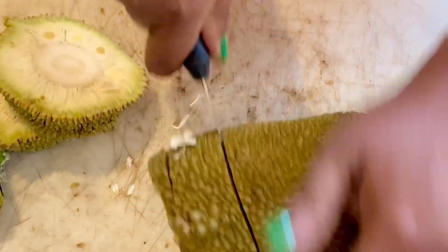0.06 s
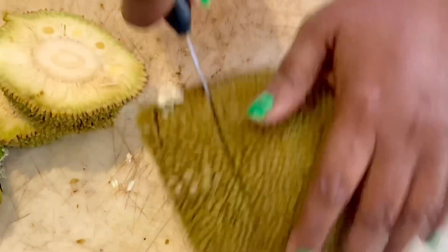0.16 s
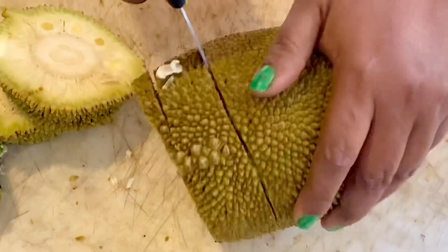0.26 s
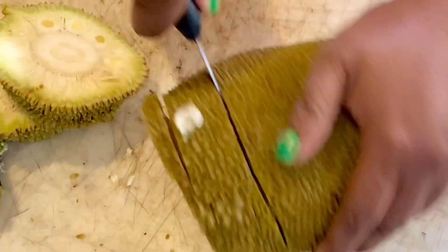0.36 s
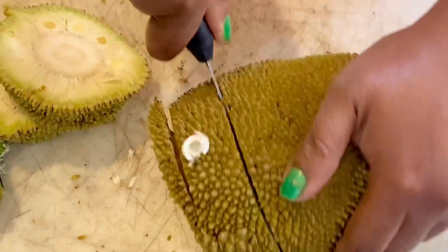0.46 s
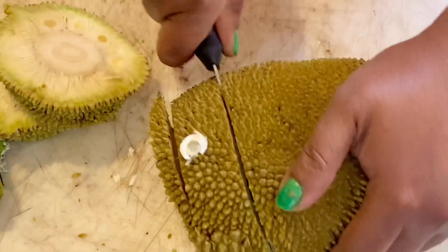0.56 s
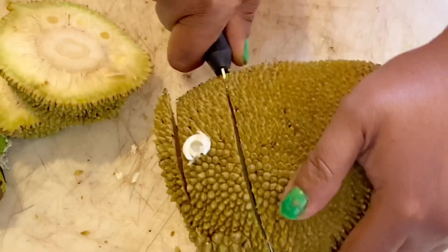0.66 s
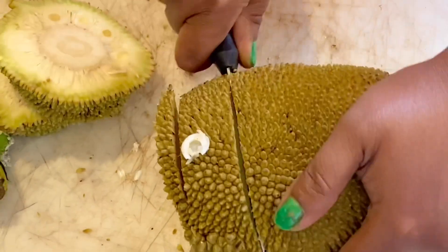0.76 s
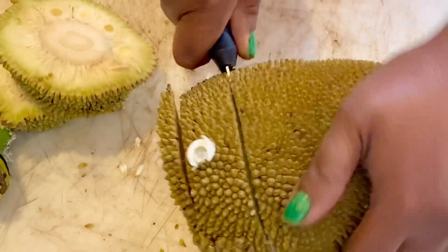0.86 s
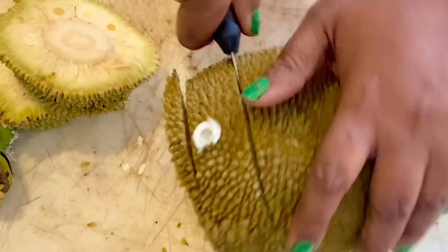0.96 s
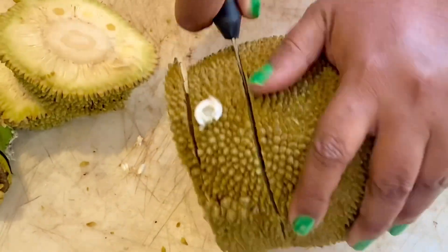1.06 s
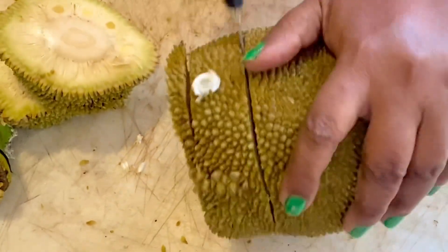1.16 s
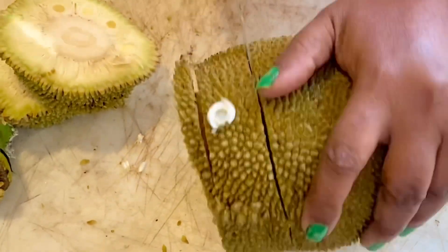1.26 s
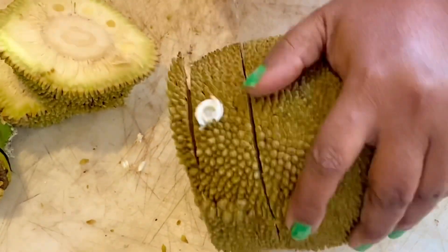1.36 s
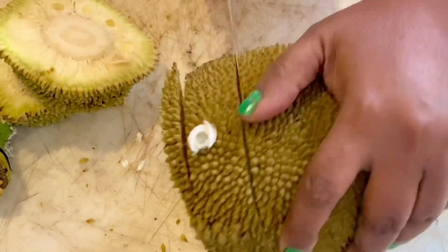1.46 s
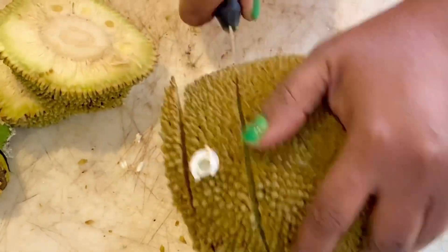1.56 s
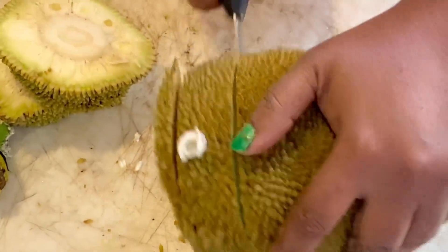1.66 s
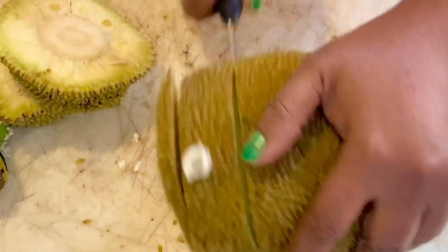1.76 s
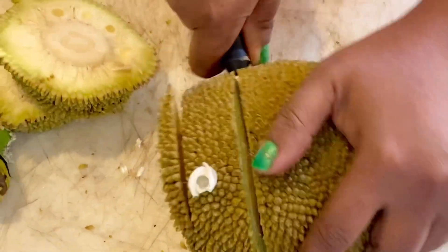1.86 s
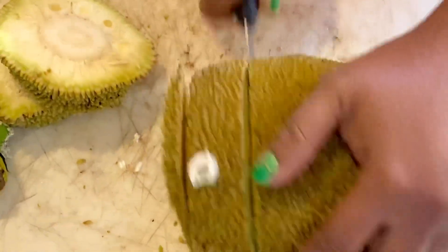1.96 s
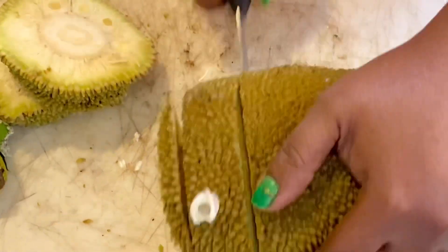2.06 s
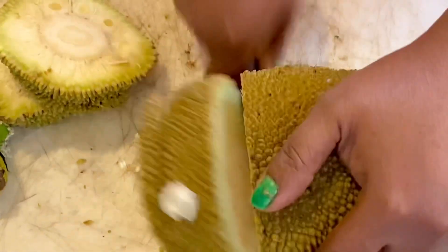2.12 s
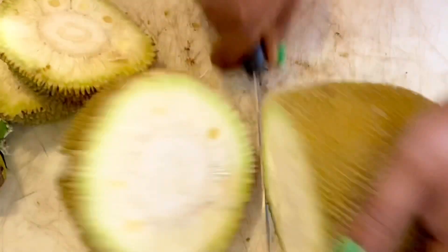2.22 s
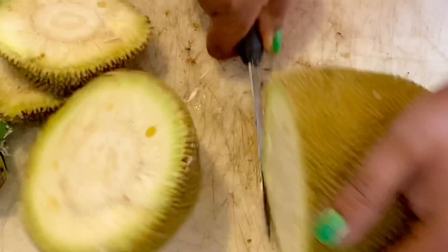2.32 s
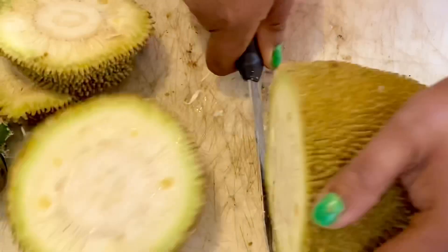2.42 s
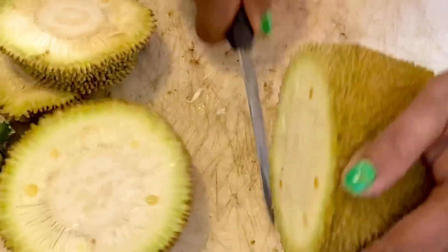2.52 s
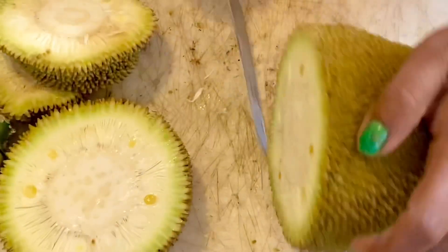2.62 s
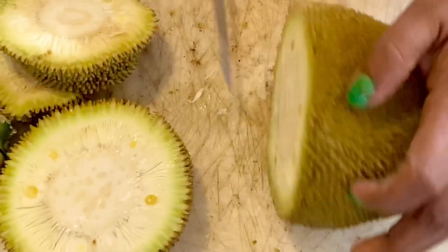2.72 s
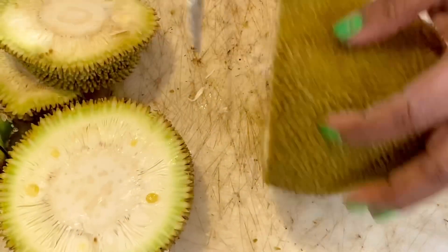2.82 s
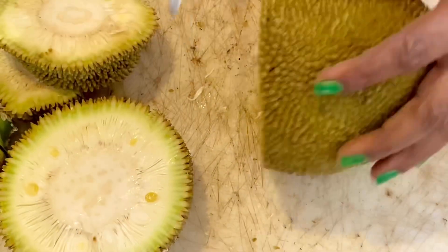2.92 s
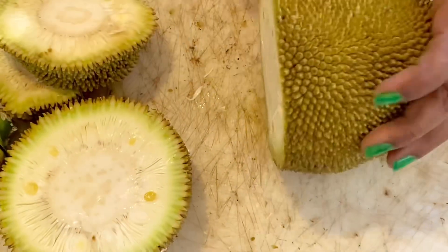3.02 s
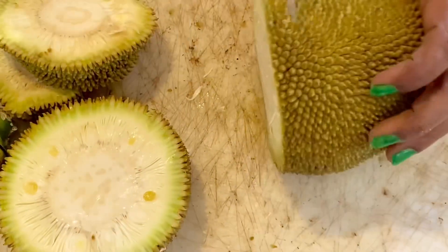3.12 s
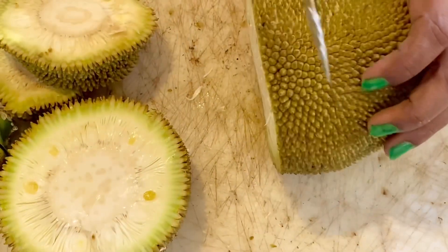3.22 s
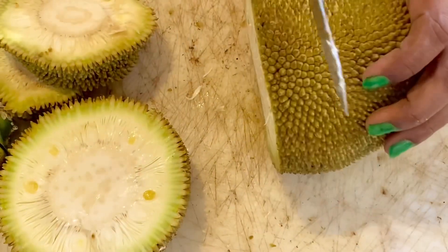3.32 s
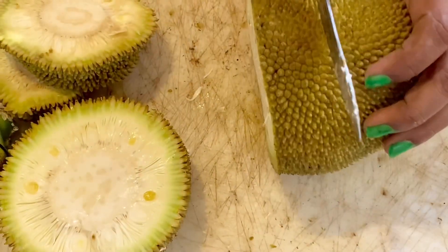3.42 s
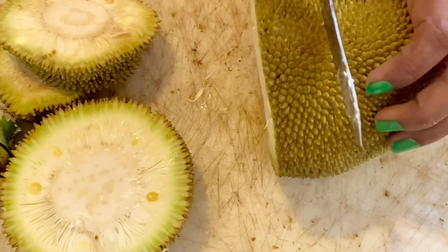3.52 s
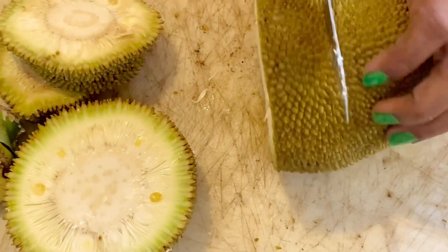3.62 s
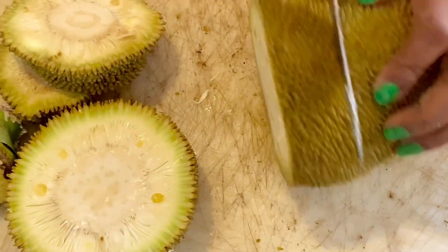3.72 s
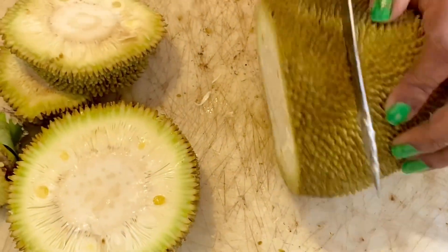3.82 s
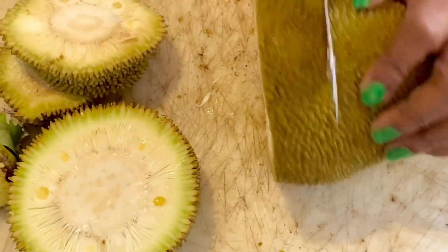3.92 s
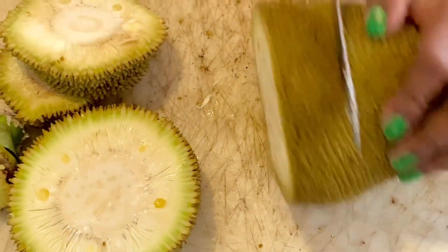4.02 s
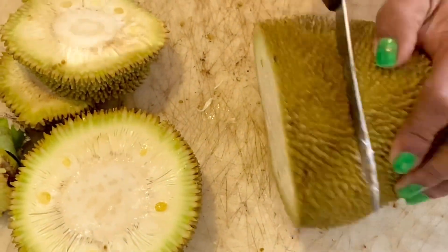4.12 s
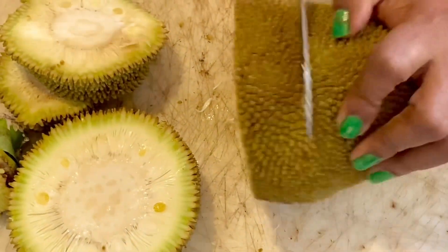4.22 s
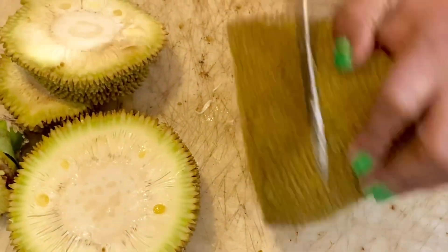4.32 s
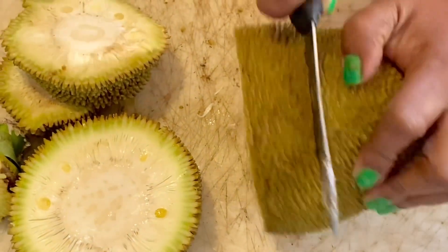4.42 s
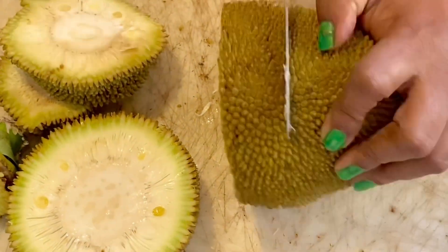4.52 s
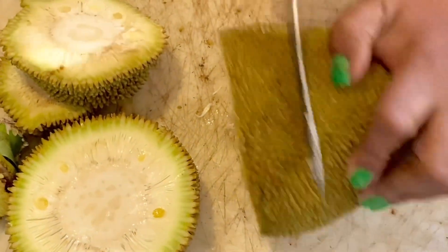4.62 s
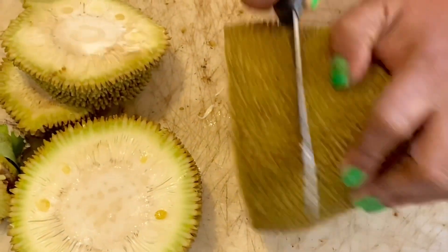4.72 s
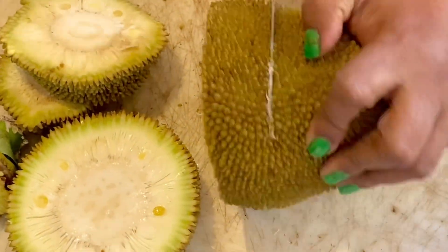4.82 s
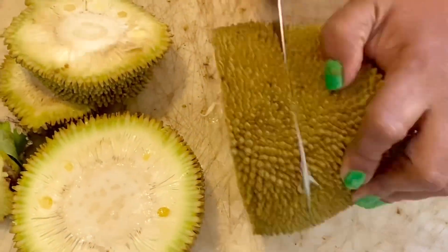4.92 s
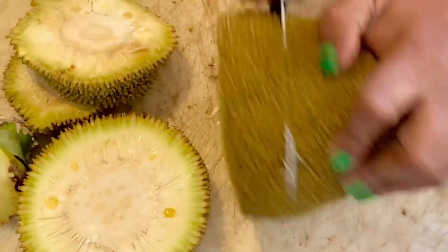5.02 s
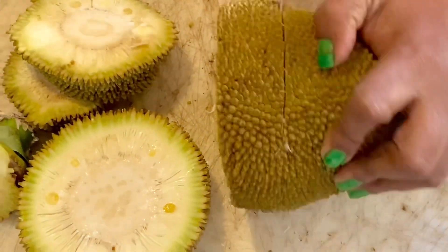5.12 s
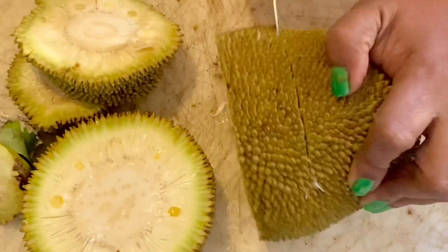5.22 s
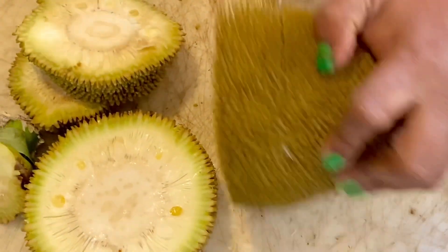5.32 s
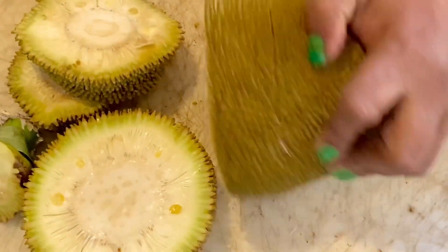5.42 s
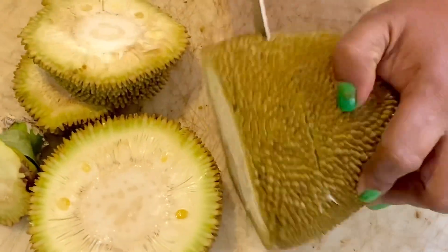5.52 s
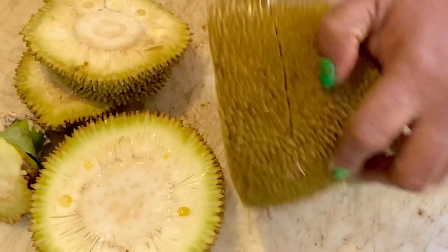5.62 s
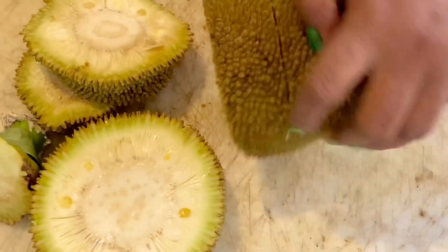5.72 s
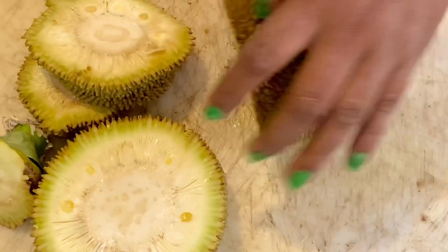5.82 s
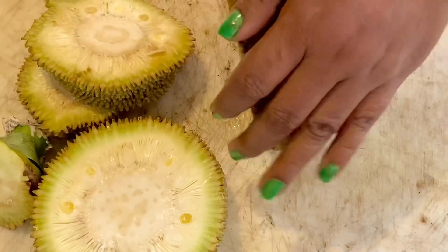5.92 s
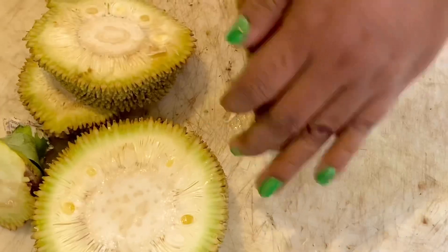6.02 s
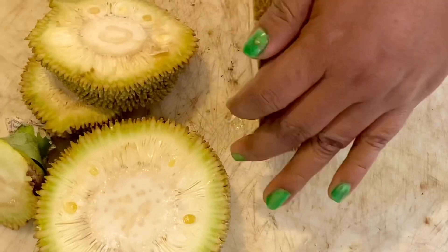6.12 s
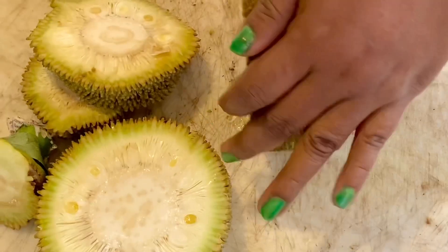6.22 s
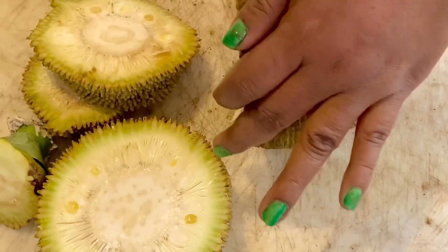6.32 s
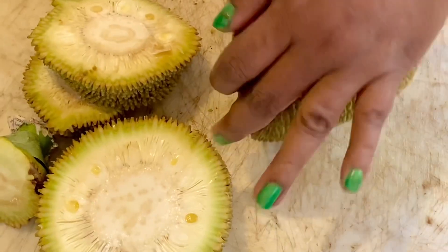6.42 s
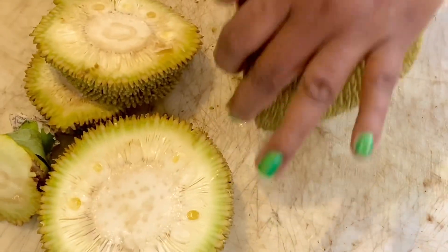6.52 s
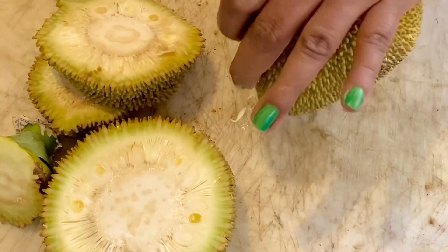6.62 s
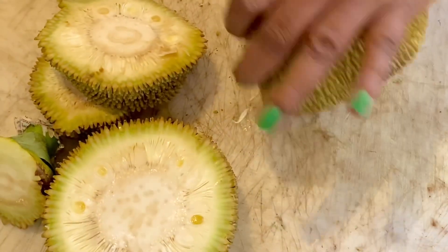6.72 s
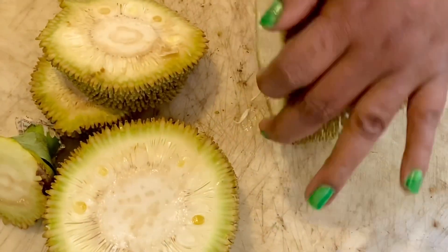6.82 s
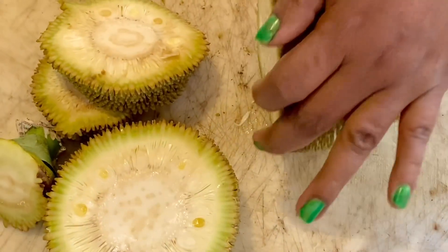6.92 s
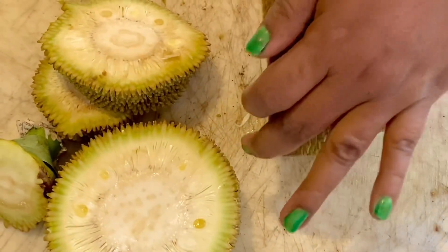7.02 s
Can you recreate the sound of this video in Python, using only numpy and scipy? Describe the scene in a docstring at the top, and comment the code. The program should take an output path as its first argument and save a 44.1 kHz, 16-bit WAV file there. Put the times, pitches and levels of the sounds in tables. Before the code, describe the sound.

A heavy jackfruit scuffs and bumps on a cutting board as a kitchen knife saws into it with short, crunchy strokes and tiny snaps. The blade breaks through with one sharp, loud knock, and a wet slice flops over. Quicker sawing follows, then the fruit is dragged around with soft bumps and faint squeaks. It is heard close up in a slightly echoing kitchen with a low fridge hum.

```python
"""First a knobbly jackfruit scuffs over a cutting board, then a kitchen knife saws into it.
Each stroke tears a spray of tiny fibres, and spikes of the rind snap. The blade breaks through and
knocks the board, and the wet slice flops over. Quick sawing starts the next cut, then the heavy fruit
is dragged round, bumping and squeaking. The kitchen echoes, and a fridge hums behind it all."""
import sys
import numpy as np
from scipy import signal
from scipy.fft import rfft, irfft
from scipy.io import wavfile
from scipy.ndimage import uniform_filter1d

SR = 44100
rng = np.random.default_rng(int(sys.argv[2]) if len(sys.argv) > 2 else 0)


def unload_audio(sound):
    """Save the sound as a 16-bit wav file, at the path given as the first command line argument."""
    columns = np.transpose(np.atleast_2d(sound))
    # keep every value between -1 and 1, then stretch to whole-number steps
    steps = np.round(np.clip(columns, -1, 1) * 32767)
    wavfile.write(sys.argv[1], SR, steps.astype(np.int16))


N = 311777
T = np.arange(N) / SR

# knife strokes: t/s, length/s, level/dB, hollow flesh/dB, hiss/dB (the last two on top of the level)
STROKES = [(.282, .093, -58, 2, -3.5), (.334, 0.16, -60, 8.5, -1), (.474, .09, -62.5, 1, 2),
           (1.07, .18, -65.5, 1, 1), (1.37, .16, -54.5, 3.5, -3.5), (1.704, .1, -52.5, 5, -1.5),
           (1.868, .12, -57.5, 4, 3.5), (2.0, .09, -53.5, 5.5, 2.5), (2.05, 0.086, -40, 0, 2),
           (3.527, 0.081, -66, 4, -1), (3.651, 0.096, -61.5, 5, -1), (3.823, .11, -55, 0.5, 3),
           (3.976, 0.076, -51, -2.5, -0.5), (4.143, 0.077, -53.5, 6, 3), (4.275, 0.092, -55, 2, 2.5),
           (4.422, 0.086, -56, 5.5, 2.5), (4.555, 0.099, -55, 0.5, 0), (4.698, 0.1, -55, 6.5, 0),
           (4.851, 0.09, -55.5, 6, -0.5), (4.995, 0.12, -57, 9, 1.5), (5.137, 0.09, -58, 2, -1)]
# the fruit shoved and turned on the board: same columns as the strokes
SCUFFS = [(-.03, .1, -65, 2, -4), (.04, .18, -56, 2, -12), (.79, 0.17, -66.5, 2.5, -3.5),
          (1.588, .091, -69, 10, -13), (2.46, 0.36, -71, -3, -4.5), (2.815, 0.073, -68, 5, -10),
          (3.01, 0.14, -71.5, -3.5, -22), (5.263, 0.087, -52.5, 5, -9), (5.342, 0.043, -70.5, 21, -11),
          (5.387, .11, -61, 2, -6.5), (5.5, 0.27, -59, 3.5, -5.5), (5.95, .12, -55, 3.5, -3.5),
          (6.41, 0.22, -66.5, 0, -7), (6.633, 0.16, -59.5, -3, -1), (6.9, .17, -67.5, 10, -4)]
# tone of the soft flesh, the rasping rind and the hissing edge: f/Hz, level/dB
FLESH_TONE = [(150, -12), (300, -1), (480, 2.5), (690, -6), (850, 0), (1080, -2.5), (1280, -5.5),
              (1500, -3.5), (1800, -5.5), (2050, -7.5), (2600, -20), (5000, -50)]
RIND_TONE = [(900, -34.5), (1700, -6.5), (2200, -1), (3000, -0.5), (3700, -2), (4400, -6), (5100, -3.5),
             (6000, -7), (7000, -7.5), (8500, -20), (12000, -34.5)]
EDGE_TONE = [(3500, -46.5), (6500, -5.5), (8500, 2.5), (10500, 0.5), (14500, -5), (16000, -1.5)]
# hollow notes of the fruit: f/Hz, width/Hz, level/dB
HOLLOW_NOTES = [(880, 90, 2), (1260, 110, -0.5)]
# single spikes of the rind snapping: t/s, level/dB
SNAPS = [(.3187, -36), (.5013, -43), (0.5174, -46), (0.599, -62), (0.6577, -72), (1.3691, -46),
         (1.412, -41.5), (1.707, -37.5), (1.754, -37), (1.8791, -36.5), (1.8914, -39.5), (1.9507, -38),
         (2.0204, -40), (2.062, -31), (2.855, -59.5), (3.016, -62.5), (3.1, -67.5), (3.8215, -57.5),
         (3.962, -46), (3.973, -53), (3.9974, -33), (4.155, -54), (4.4335, -42.5), (4.719, -46.5),
         (4.9008, -36.5), (5.0479, -42.5), (5.99, -42.5), (6.757, -47), (6.8789, -61.5), (6.979, -43.5),
         (7.0481, -46.5)]
# tone of a spike's bright tick and of its woody base: f/Hz, level/dB
TICK_TONE = [(1500, -15.5), (4000, -11), (7000, -1), (10000, -2), (14000, -4.5), (16000, -4.5)]
WOODY_TONE = [(200, -6.5), (500, 0.5), (900, 2), (1600, 1), (3000, -4), (5000, -6.5), (7000, -11),
              (11000, -28.5)]
# the blade hitting the board and bouncing twice: t/s, level/dB, contact time/s
KNOCKS = [(2.1047, 0, .00012), (2.1078, -20, .00017), (2.1168, -19, .00019)]
# blade and board ringing together: f/Hz, level/dB, t60/s (the time to fade by 60 dB)
BOARD_NOTES = [(167, -21.4, 0.044), (315, -23.9, 0.13), (387, -20.7, 0.113), (509, -17.6, 0.067),
               (605, -25.7, 0.055), (659, -24.5, 0.13), (812, -10.2, 0.033), (880, -6.8, 0.043),
               (1132, -20.2, 0.13), (1298, -12.4, 0.012), (1462, -22.7, 0.121), (1528, -24.8, 0.13),
               (1786, -10.5, 0.019), (1830, -22.4, 0.13), (1858, -19.8, 0.117), (2027, -19.7, 0.088),
               (2205, -18.9, 0.098), (2408, -10.8, 0.049), (2462, -7.9, 0.022), (2783, -16.0, 0.019),
               (2983, -17.1, 0.071), (3081, -29.5, 0.13), (3219, -14.8, 0.026), (3660, -17.4, 0.025),
               (4057, -19.0, 0.014), (4701, -23.9, 0.044), (5442, -21.2, 0.018), (6507, -16.7, 0.015),
               (7008, -18.3, 0.017), (7500, -19.7, 0.012)]
# tone of the crack that the knock sends into the room: f/Hz, level/dB
CRACK_TONE = [(100, -12), (400, -3.5), (900, -10), (1400, -2.5), (2300, -0.5), (3000, -4.5), (3800, -11),
              (5000, -15.5), (7000, -22.5), (9000, -36), (15000, -39.5)]
# the fruit bumping the board, and at 2.105 s the low thud of the blade's knock: t/s, level/dB, contact time/s,
# share of ring time the hands leave (0-1)
BUMPS = [(0.319, -38, 0.0013, 1), (.332, -36.5, 0.0025, 1), (.386, -24.5, 0.0073, 0.86),
         (0.413, -27, 0.0061, 1), (.429, -27.5, 0.0058, 1), (0.601, -37, 0.006, 1), (.94, -43, 0.0075, 0.8),
         (1.445, -34.5, 0.0073, 1), (1.494, -36, 0.0068, .6), (1.779, -13.5, 0.0064, 0.31),
         (2.105, -25, 0.0018, 0.6), (2.227, -27.5, 0.0084, 1), (2.26, -36.5, 0.0029, 1),
         (3.922, -36, 0.0085, 0.97), (4.91, -17.5, 0.0088, 0.68), (5.016, -35.5, 0.0031, 0.9),
         (5.212, -29.5, 0.0067, 0.6), (5.902, -41.5, 0.0014, 0.63), (5.993, -39.5, .001, 0.82),
         (6.011, -37, .0017, 0.6), (6.57, -35, 0.011, 1), (6.772, -42.5, 0.0073, 0.84)]
# board and counter ringing under the heavy fruit: f/Hz, level/dB, t60/s
COUNTER_NOTES = [(60, -8, 0.36), (91, -4, 0.21), (115.8, -2, 0.18), (173, -3, 0.05), (224.4, -7.5, 0.2),
                 (328, -3, 0.061), (436, -3, 0.071), (620, -7.5, 0.055), (840, -9, 0.055)]
# tone of the counter's rumble: f/Hz, level/dB
RUMBLE_TONE = [(20, -21), (48, 4.5), (75, 6.0), (130, -6.0), (250, -6.5), (420, -16.5), (900, -46)]
# the cut slice flopping over and settling: t/s, level/dB, contact time/s
FLOPS = [(2.376, -26, 0.0013), (2.477, -29, 0.001)]
# the slice thudding on the board: f/Hz, level/dB, t60/s
SLICE_NOTES = [(55, -2.5, 0.27), (87.7, -2.5, 0.27), (126, -2.5, 0.23), (180, -1, 0.28), (234, -9.5, 0.2),
               (299, -4, 0.14), (392, -9, 0.084), (477, -18, 0.053)]
# tone of its wet slap: f/Hz, level/dB
SLAP_TONE = [(150, -11), (400, 0.5), (620, -6), (820, -1), (1200, -17), (4000, -28), (12000, -45)]
# the spiky rind squeaking on the board: t/s, length/s, level/dB, f/Hz
SKIDS = [(0.103, 0.077, -60.5, 2700), (0.114, 0.074, -51.5, 820), (0.344, 0.15, -57, 2920),
         (.40, 0.036, -53.5, 1660), (5.251, 0.096, -56.5, 2650), (6.647, 0.083, -55.5, 2570),
         (6.686, 0.042, -60, 3060), (6.76, 0.024, -61, 2650)]
# how long the kitchen echoes: f/Hz, t60/s
ECHO_TIMES = [(100, 0.22), (500, 0.68), (2200, 0.89), (5000, 0.82), (9000, 0.92), (16000, 0.091)]
# tone of the echo, and of the part that is opposite in left and right: f/Hz, level/dB
ECHO_TONE = [(60, -5.5), (300, 0), (700, -1), (1300, -4.5), (2300, -3), (3200, -6), (4500, -7.5),
             (8000, -8.5), (16000, -5.5)]
SIDE_TONE = [(60, -1.5), (300, -2.0), (800, 6.0), (1300, 11.0), (2400, 3.5), (4400, -10.5),
             (8000, -5.5), (16000, 12.5)]
# the fridge's hum notes, the tone of its low rush of air and of its fan: f/Hz, level/dB
HUM_NOTES = [(59.3, -58.5), (118.8, -58.5), (181, -75)]
AIR_TONE = [(25, -17.5), (50, -2), (70, 0), (90, -12), (120, -6), (200, -4), (300, -16.5), (600, -21.5),
            (1400, -34.5), (2400, -31), (3000, -41), (4200, -37), (8000, -57), (11000, -68.5),
            (15000, -83.5)]
FAN_TONE = [(60, 2), (250, 0), (700, -9.5), (1400, -9), (2000, -14), (3200, -41.0), (8000, -51.5),
            (15000, -71.5)]


def sawing():
    """The blade catches on the knobs and tears flesh and rind; between cuts the rind scuffs the board."""
    fibres = deepening_cut(tearing(per_s=3000, spread_db=3.0, smooth=.45))
    rind, edge = unit(colour(fibres, RIND_TONE)), unit(colour(fibres, EDGE_TONE))
    flesh = unit(colour(tearing(per_s=1500, spread_db=3.5, smooth=.5), FLESH_TONE))
    catching = undb(1.5 * wander(170))
    return catching * (slides(STROKES, flesh, rind, edge) + slides(SCUFFS, flesh, rind, edge))


def tearing(per_s, spread_db, smooth):
    """Many tiny breaks of very uneven size, over a smooth rub."""
    size = undb(spread_db * np.minimum(rng.exponential(size=N), 4))
    breaks = (rng.random(N) < per_s / SR) * size * rng.choice([-1, 1], N)
    return unit(unit(breaks) + smooth * rng.standard_normal(N))


def deepening_cut(x, depth=.2, count=6):
    """As the cut deepens and the fruit turns, short echoes inside it swell and fade, shifting its tone."""
    lags = rng.integers(20, 190, count)  # in samples
    return unit(x + depth * sum(wander(9) * np.roll(x, lag) for lag in lags))


def slides(rows, flesh, rind, edge):
    """Each slide speeds up and stops, sounding the hollow flesh, the rasping rind and a fine hiss."""
    out = np.zeros(N)
    # each new grip moves the hollow notes by about a tenth
    grips = np.exp(0.098 * rng.standard_normal((len(rows), len(HOLLOW_NOTES))))
    for (s, length, db, flesh_db, hiss_db), grip in zip(rows, grips):
        now = (T > s) & (T < s + length)
        speed = np.abs(np.sin(np.pi * (T[now] - s) / length))
        notes = sum(undb(note_db) * resonate(flesh[now], hz * shift, width)
                    for (hz, width, note_db), shift in zip(HOLLOW_NOTES, grip))
        rasp = undb(flesh_db) * unit(flesh[now] + notes) + rind[now] + undb(hiss_db) * edge[now]
        out[now] += undb(db) * speed ** 1.5 * rasp  # faster is louder
    return out


def spike_snaps():
    """A spike gives way with a bright tick that also sounds its woody base."""
    tick, wood = np.zeros(N), np.zeros(N)
    for s, db in SNAPS:
        wood_db = -44.5 + .55 * (db + 36)  # grows less than the tick, so hard snaps are brighter
        add(tick, s, undb(db) * burst(t60=0.014) * (1 - fade(.004)))
        add(wood, s, undb(wood_db) * burst(t60=0.056) * (1 - fade(0.0017)))
    return undb(-2) * colour(tick, TICK_TONE) + colour(wood, WOODY_TONE)


def blade_knock():
    """The freed blade slams down: it rings with the board and sends a hard crack into the kitchen."""
    force = np.zeros(N)
    for s, db, contact in KNOCKS:
        add(force, s, undb(db) * push(contact))
    bang = through(force, ring(BOARD_NOTES))
    crack = undb(-23.5) * bang + undb(3.0) * colour(force, CRACK_TONE)
    return bang, crack


def fruit_bumps():
    """The heavy fruit bumps the board softly, and the blade's knock adds a low thud; the hands cut some of the
    ringing short."""
    out = np.zeros(N)
    for s, db, contact, share in BUMPS:
        add(out, s, undb(db) * through(ring(COUNTER_NOTES, share), push(contact)))
    return out


def slice_falls():
    """The slice lands on its rim, then on its face: a thud and a wet slap each time."""
    force, slap = np.zeros(N), np.zeros(N)
    for s, db, contact in FLOPS:
        add(force, s, undb(db) * push(contact))
        add(slap, s, undb(db - 14) * burst(t60=0.16))
    return through(force, ring(SLICE_NOTES)) + colour(slap, SLAP_TONE)


def rind_skids():
    """Spike tips stick and slip on the board and ring in a rough squeak."""
    out, slips = np.zeros(N), tearing(per_s=500, spread_db=3.5, smooth=0.06)
    for s, length, db, hz in SKIDS:
        rub, width = slips[int(s * SR):][:int(length * SR)], .18 * hz
        squeak = resonate(resonate(rub, hz, width), hz, width)
        squeak += undb(-8.5) * resonate(rub, 1.73 * hz, width)
        squeak += undb(-12.5) * resonate(rub, 2.69 * hz, width)
        add(out, s, undb(db) * unit(squeak) * signal.windows.tukey(len(rub), .7))
    return out


def counter_rumble(cuts, push_s=0.075, rest_db=-63.5, most_db=-51):
    """The counter rumbles more the harder the hands work, so it follows the loudness of the cutting."""
    rumble = colour(rng.standard_normal(N), RUMBLE_TONE)
    effort = np.sqrt(np.abs(uniform_filter1d(cuts ** 2, int(push_s * SR))))
    return np.minimum(undb(rest_db) + undb(1) * effort, undb(most_db)) * rumble


def kitchen_echo():
    """The room's answer to one click: a wash of noise in which each band fades at its own pace."""
    spectrum, hz = rfft(rng.standard_normal(SR)), np.fft.rfftfreq(SR, 1 / SR)
    centres_hz = np.geomspace(100, 16000, 9)
    tail = np.zeros(SR)
    for centre, weights in zip(centres_hz, np.eye(len(centres_hz))):
        band = irfft(spectrum * look_up(np.c_[centres_hz, weights], hz), SR)
        tail += band * fade(look_up(ECHO_TIMES, centre))
    tail *= np.clip((T[:SR] - .003) / 0.0013, 0, 1)  # the echo starts after 3 ms
    return colour(tail / np.linalg.norm(tail), ECHO_TONE)


def fridge():
    """The fridge hums, and its fan blows softly with a faint whine."""
    hum = sum(np.sqrt(2) * undb(db) * np.sin(2 * np.pi * hz * T + .25 * wander(1.6))
              for hz, db in HUM_NOTES)
    air = undb(-58.5) * colour(rng.standard_normal(N), AIR_TONE) * undb(0.52 * wander(4.1))
    whine = undb(-74.5) * unit(resonate(resonate(rng.standard_normal(N), 1690, 110), 1690, 170))
    fan = undb(-61.5) * np.array([colour(rng.standard_normal(N), FAN_TONE) for _ in range(2)])
    return hum + air + whine + fan


def push(contact_s):
    """The force of one blow: the same push spread over more time sounds duller."""
    count = max(int(contact_s * SR), 1)
    force = np.sin(np.pi * (np.arange(count) + .5) / count)
    return force / force.sum()


def ring(notes, share=1):
    """A struck object rings with fading notes; neighbouring notes swing opposite ways."""
    return sum((-1) ** k * undb(db) * np.sin(2 * np.pi * hz * T[:SR]) * fade(t60 * share)
               for k, (hz, db, t60) in enumerate(notes))


def resonate(x, hz, width_hz):
    """Keep the part of a sound near one pitch."""
    return signal.lfilter(*signal.iirpeak(hz, hz / width_hz, fs=SR), x)


def colour(x, tone, size=4096):
    """Shape a sound with a tone table; plain noise keeps its power."""
    cepstrum = irfft(np.log(undb(look_up(tone, np.fft.rfftfreq(size, 1 / SR)))))
    # fold it so that the filter never sounds before its input
    cepstrum[1:size // 2] *= 2
    cepstrum[size // 2 + 1:] = 0
    response = irfft(np.exp(rfft(cepstrum)))
    return through(x, response / np.linalg.norm(response))


def through(x, response):
    """Pass a sound through something, given its answer to one click."""
    return signal.fftconvolve(x, response)[:len(x)]


def look_up(table, hz):
    """Read between a table's rows, with octaves evenly spaced."""
    freqs, values = np.transpose(table)
    return np.interp(np.log(hz + 1), np.log(freqs), values)


def wander(per_s):
    """A smooth random drift, about 1 in size."""
    hold = max(int(SR / per_s), 1)
    steps = np.repeat(rng.standard_normal(N // hold + 1), hold)
    return unit(uniform_filter1d(steps, hold)[:N])


def fade(t60):
    """A one-second curve that falls 60 dB every t60 seconds."""
    return np.exp(-np.log(1000) * T[:SR] / t60)


def burst(t60):
    """Noise that dies away."""
    return rng.standard_normal(SR) * fade(t60)


def add(track, s, sound):
    """Mix a sound in at s seconds."""
    start = max(int(s * SR), 0)
    track[start:start + len(sound)] += sound[:N - start]


def undb(db):
    """Turn decibels into a multiplier."""
    return 10 ** (np.asarray(db) / 20)


def unit(x):
    """Scale to an average power of 1."""
    return x / np.sqrt(np.mean(x ** 2))


def scene():
    """Close sounds on the board, their echo in the kitchen, and the fridge."""
    cuts = sawing() + spike_snaps() + rind_skids()
    thuds = fruit_bumps() + counter_rumble(cuts) + slice_falls()
    bang, crack = blade_knock()
    into_room = undb(-14.5) * cuts + crack + undb(-11.5) * thuds
    # the echo is mostly centred, and wider around 1.3 kHz and at the very top
    side = colour(through(into_room, kitchen_echo()), SIDE_TONE)
    echo = through(into_room, kitchen_echo()) + undb(-2.0) * side * np.array([[1], [-1]])
    return cuts + bang + thuds + echo + fridge()


def record(dry):
    """The left channel is a little weaker in the lows; both channels lose the very top."""
    left, right = dry
    lows = signal.sosfilt(signal.butter(1, 2800, fs=SR, output="sos"), left)
    left = left + (undb(-1.82) - 1) * lows
    # the left channel is phase-shifted near these pitches, which makes the treble sound wider
    for hz, sharpness in [(8550, 10), (12150, 8), (15800, 14)]:
        _, poles = signal.iirnotch(hz, sharpness, fs=SR)
        left = signal.lfilter(poles[::-1], poles, left)
    stereo = np.clip(undb(0.73) * np.array([left, right]), -1, 1)
    top_cut = signal.ellip(8, .2, 70, 15450, fs=SR, output="sos")
    return signal.sosfilt(top_cut, stereo)


dry = scene()
out = record(dry)
unload_audio(out)
```